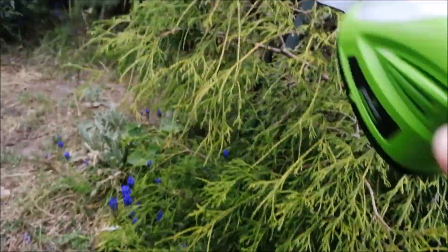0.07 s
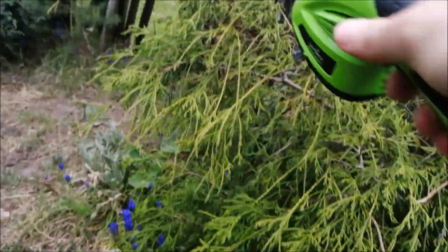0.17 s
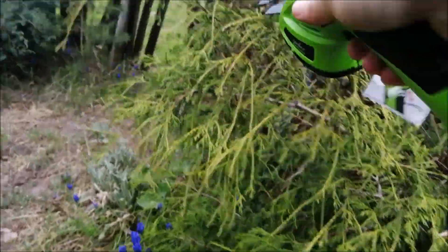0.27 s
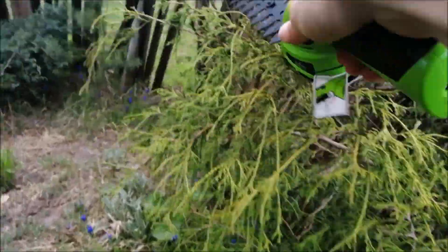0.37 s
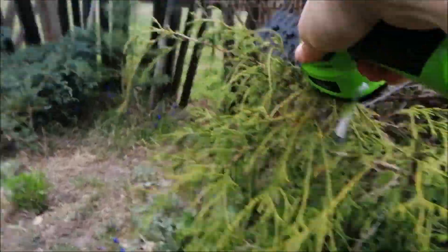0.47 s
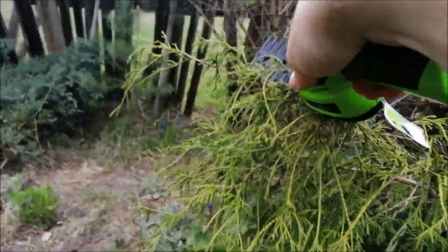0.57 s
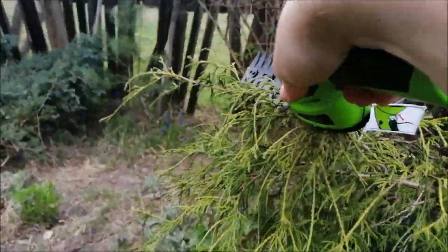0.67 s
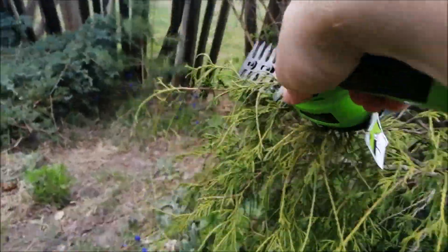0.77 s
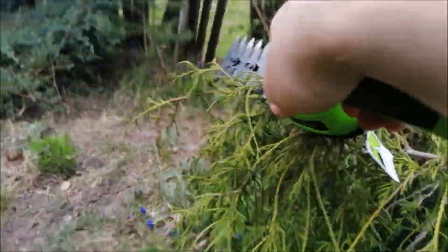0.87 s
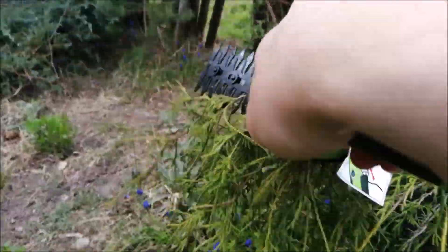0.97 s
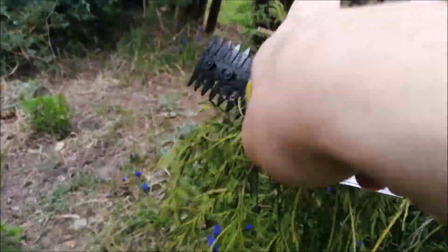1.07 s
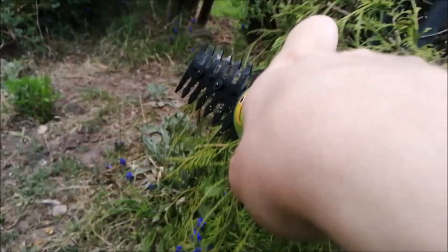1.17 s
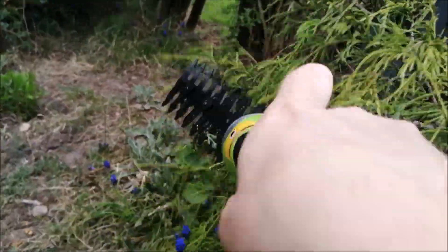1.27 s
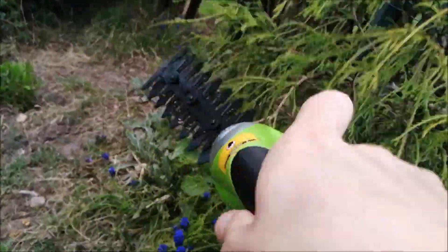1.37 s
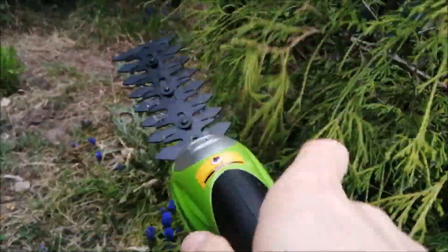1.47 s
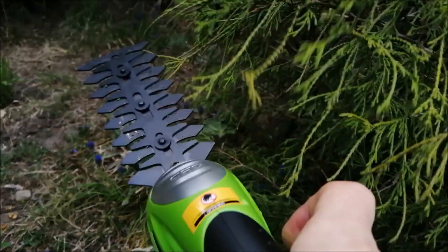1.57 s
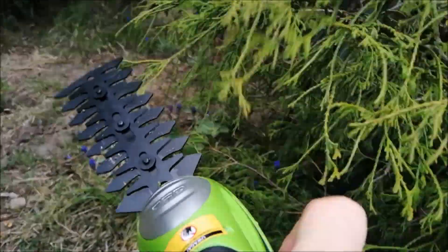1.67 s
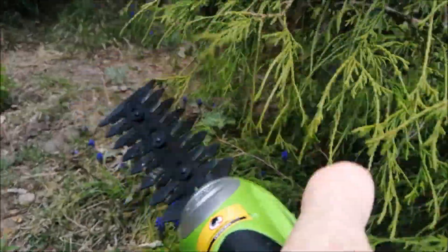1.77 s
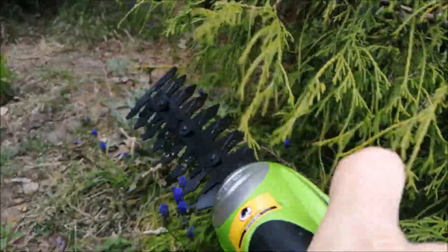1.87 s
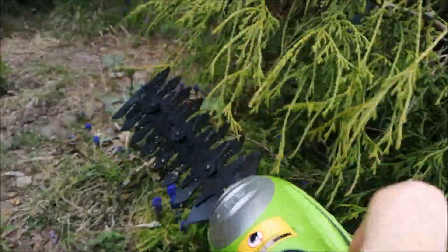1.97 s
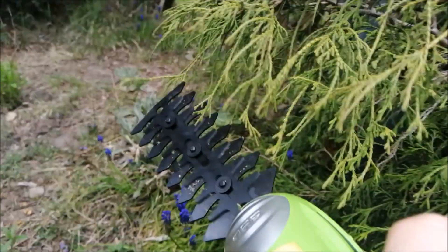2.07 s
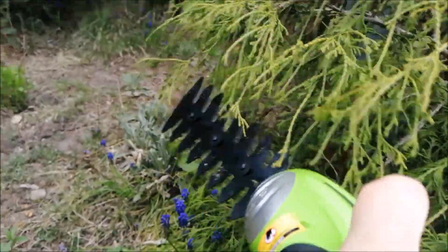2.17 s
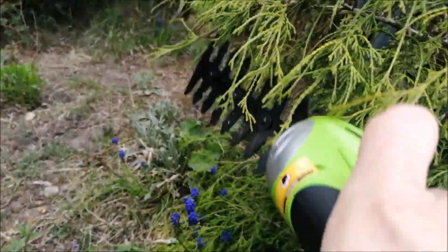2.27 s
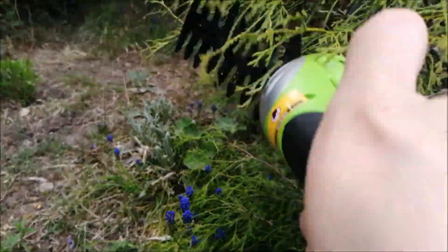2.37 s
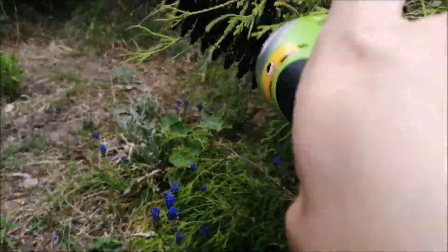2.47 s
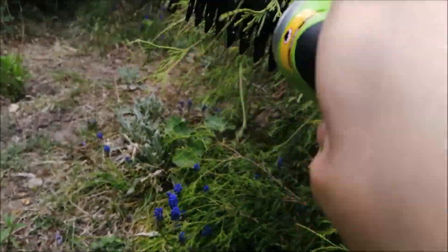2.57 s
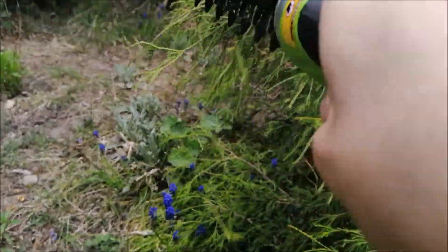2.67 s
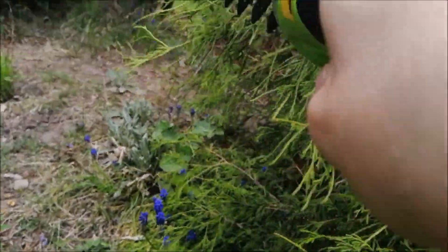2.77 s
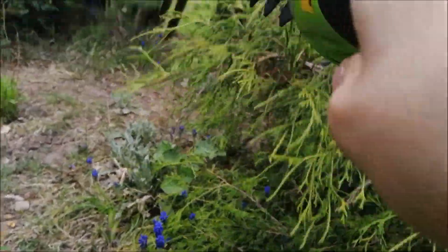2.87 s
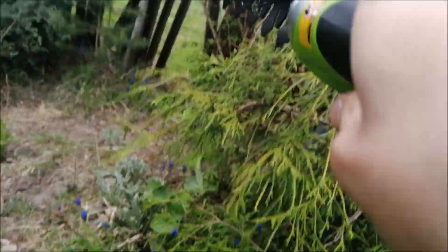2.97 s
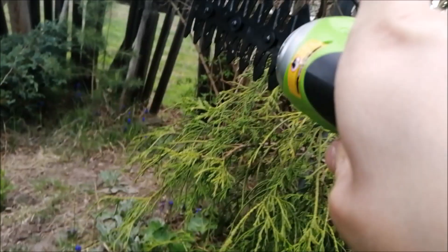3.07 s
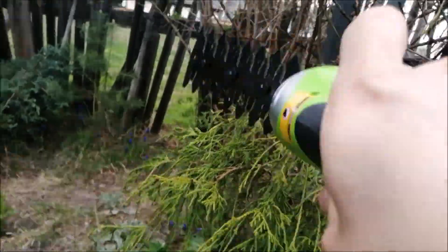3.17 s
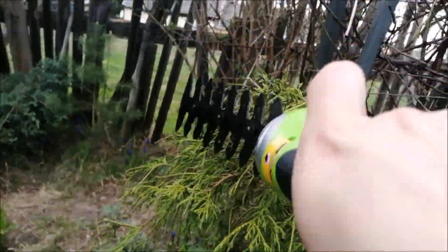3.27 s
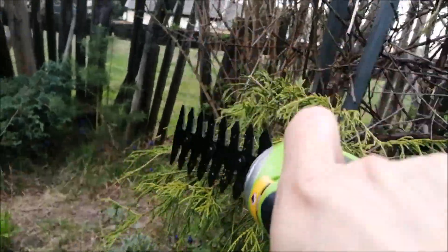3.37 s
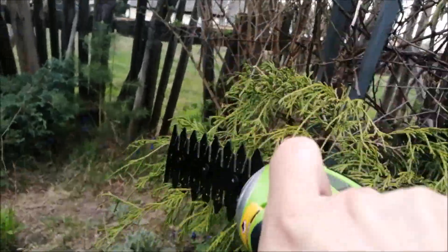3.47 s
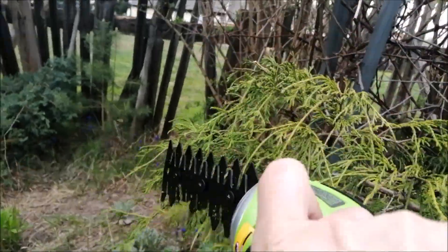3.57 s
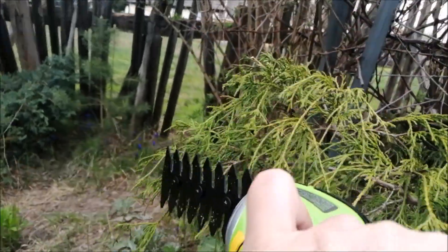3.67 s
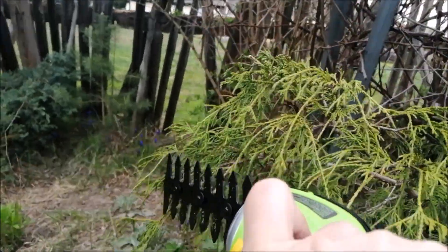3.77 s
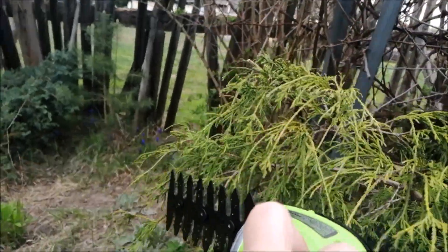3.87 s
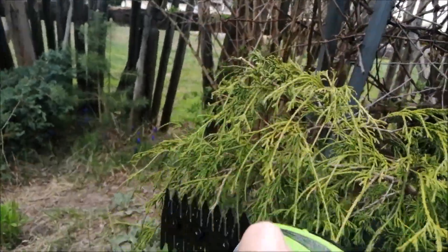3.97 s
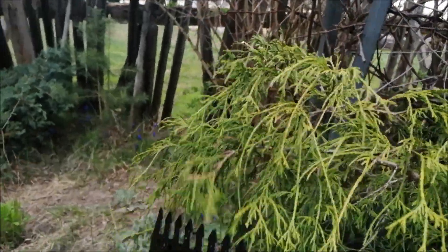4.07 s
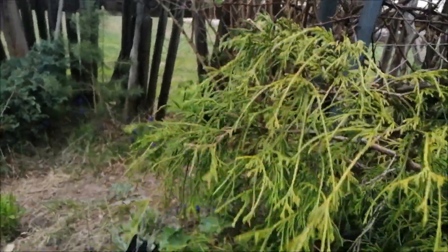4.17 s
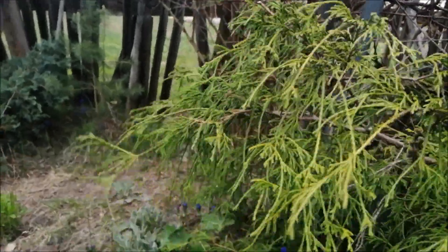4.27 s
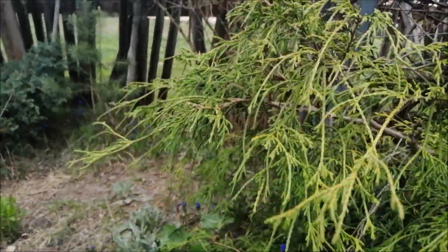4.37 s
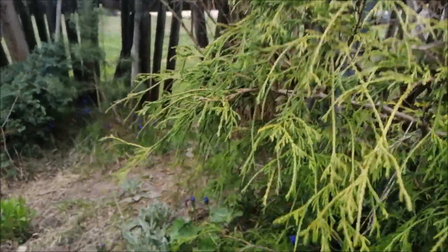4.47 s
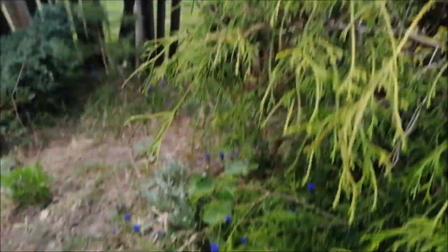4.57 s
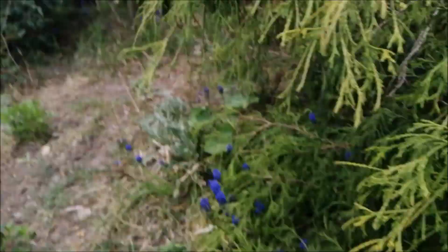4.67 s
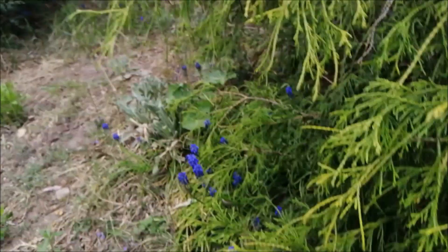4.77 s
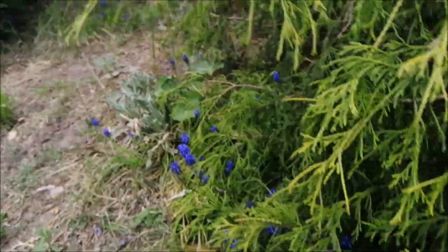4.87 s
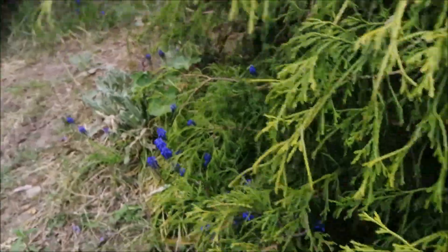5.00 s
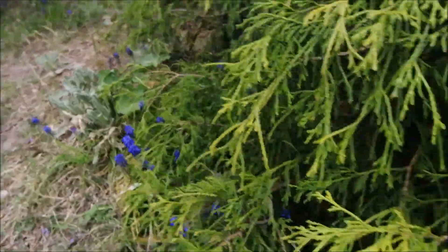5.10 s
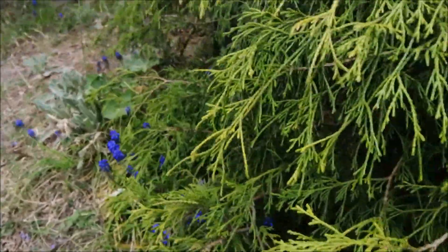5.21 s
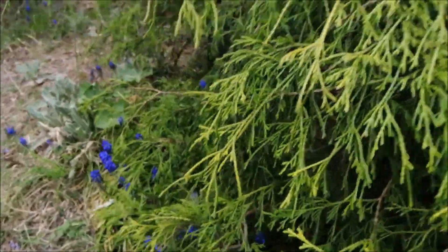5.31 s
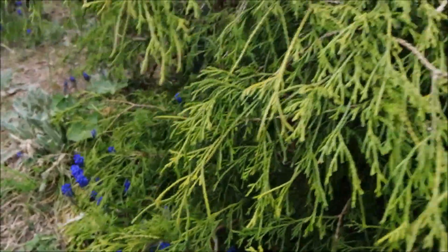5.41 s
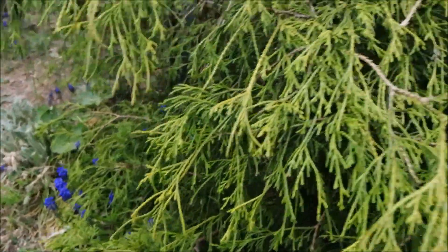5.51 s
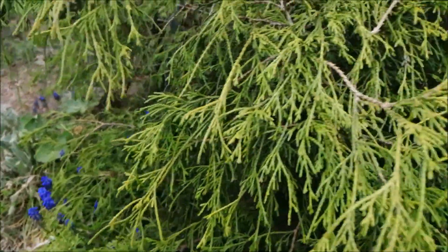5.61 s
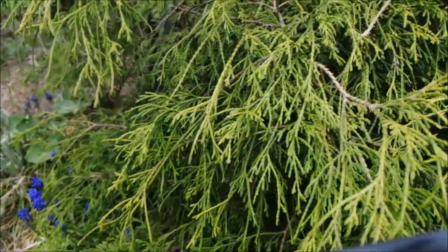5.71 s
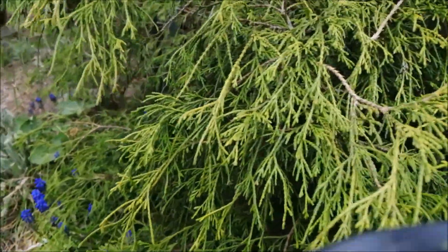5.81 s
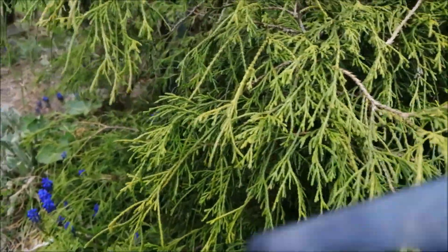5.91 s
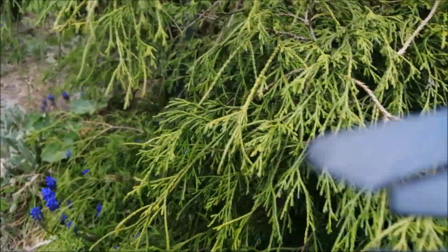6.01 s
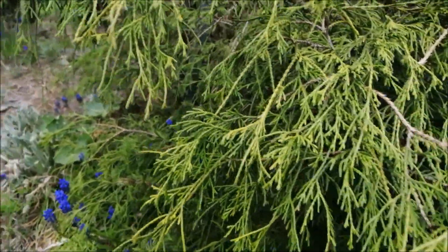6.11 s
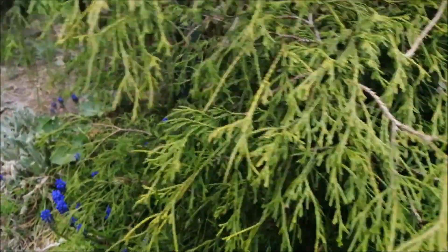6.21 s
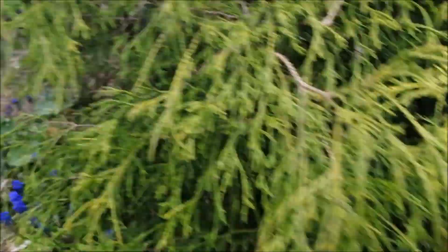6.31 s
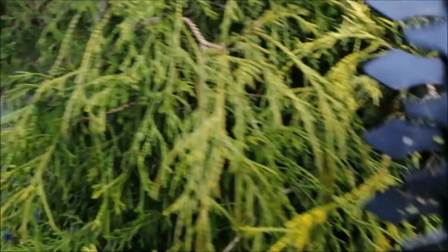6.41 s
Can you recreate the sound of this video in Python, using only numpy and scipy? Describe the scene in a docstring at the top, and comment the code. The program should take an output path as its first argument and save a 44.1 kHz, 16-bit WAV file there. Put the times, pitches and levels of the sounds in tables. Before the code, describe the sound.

Close to the microphone in a quiet garden, small battery shears start at once with a hard, rattling buzz, chop a couple of twigs and wind down quickly. Trigger clicks lead into a longer second run. After it stops, light wind, a soft far dove, tiny chirps and small handling ticks are heard, then sharp clicks and a third burst that is still running at the end.

```python
"""A garden: small battery hedge shears run in three bursts close to a two-port microphone.
A motor drives a two-stage gear train and a crank: shaped noise rattles, rubs and clacks at each
stroke end, steel modes ring and sines locked to the shaft whine. Twigs part in decaying bursts.
Between bursts: clicks of noise and decaying sines, a noise-brushed twig, a far dove and small birds
as sines. Light wind, far rumble and a garden hush of shaped noise lie underneath."""
import sys
import numpy as np
from scipy import signal
from scipy.fft import rfft, irfft, next_fast_len
from scipy.io import wavfile
from scipy.ndimage import uniform_filter1d, map_coordinates

SR = 44100
rng = np.random.default_rng(int(sys.argv[2]) if len(sys.argv) > 2 else 0)


def log_audio(samples):
    """Write samples as a 16-bit WAV file to the path given in sys.argv[1]."""
    # one column per channel
    frames = np.atleast_2d(samples).T
    # limit to full scale, then quantise
    limited = np.clip(frames, -1, 1)
    pcm = np.round(limited * 32767).astype(np.int16)
    wavfile.write(sys.argv[1], SR, pcm)


N = 284445


def amp(db):
    """Gain of a level in dB."""
    return 10 ** (np.asarray(db) / 20)


def unit(x):
    """Scaled so that the mean of the channels has rms 1."""
    mono = np.atleast_2d(x).mean(axis=0)
    return x / np.sqrt(np.mean(mono ** 2) + 1e-20)


def along(points, hz):
    """(Hz, value) points interpolated on a log axis."""
    f, v = np.transpose(points)
    return np.interp(np.log(hz + 1), np.log(f + 1), v)


def curves(rows):
    """One value per sample for each column after the time."""
    s, *cols = np.transpose(rows)
    return [np.interp(np.arange(N) / SR, s, c) for c in cols]


def wobble(knots_per_s):
    """A smooth random curve through normal random knots."""
    at = np.arange(0, N + 16, 16)
    knots = rng.standard_normal(int(N * knots_per_s / SR) + 4)
    return np.interp(np.arange(N), at, map_coordinates(knots, [at * knots_per_s / SR]))


def swell(start_s, length_s, peak_at):
    """A smooth rise and fall of height 1; peak_at is the share of the length spent rising."""
    u = np.clip((np.arange(N) / SR - start_s) / length_s, 0, 1)
    return np.sin(np.pi / 2 * np.minimum(u / peak_at, (1 - u) / (1 - peak_at)))


def sides(db):
    """Left and right gains for a left-right difference."""
    return amp(np.array([db / 2, -db / 2]))


def filtered(x, response):
    """x times a complex response of frequency."""
    m = next_fast_len(N + SR)
    return irfft(rfft(x, m) * response(np.fft.rfftfreq(m, 1 / SR)), m)[..., :N]


def above(hz, edge_hz):
    """Share of power that lies on the upper side of a soft band edge."""
    return 1 / (1 + (edge_hz / (hz + 1)) ** 24)


def patchy(x, depth_db):
    """Slow random patches of gain in time and frequency."""
    z = signal.stft(x, nperseg=512)[2]
    field = uniform_filter1d(rng.standard_normal(z.shape), size=5, axis=1)
    field = uniform_filter1d(field, size=24, axis=2)
    return signal.istft(z * amp(depth_db * field / field.std()), nperseg=512)[1][:, :N]


def rush(spectrum, shared=.1):
    """Stereo noise of one colour; a share of it is common to both ports."""
    noise = rng.standard_normal((2, N)) + shared * rng.standard_normal(N)
    return unit(filtered(noise, lambda hz: amp(along(spectrum, hz))))


# Likeness of the ports. Each row: frequency in Hz, left-right correlation.
PORT_LIKENESS = [(300, 0.31), (800, 0.89), (1800, 0.31), (2500, 0.26), (3200, 0.42), (3900, 0.53),
                 (5000, 0.067), (6000, 0.31), (16000, 0.047)]
# Port balance. Each row: frequency in Hz, left-right difference in dB.
PORT_LEAN = [(60, -8), (110, 6), (200, -2), (380, -3.5), (700, -10.5), (1290, -1.5), (2380, 0.5),
             (4400, 10.5), (8120, -7.5), (15000, 2.5)]


def ports(pair, lag_s=.00016):
    """Two unrelated signals blended as the ports hear a near source; the left port is farther."""
    def blend(hz):
        turn = np.arccos(np.clip(along(PORT_LIKENESS, hz), -1, 1)) / 2
        return np.array([np.cos(turn), np.sin(turn)])

    def lag_and_lean(hz):
        ramp = np.exp(1j * np.pi * hz * lag_s * np.array([[-1], [1]]))
        return ramp * sides(along(PORT_LEAN, hz))

    mid, side = filtered(pair, blend)
    return filtered(np.array([mid + side, mid - side]), lag_and_lean)


# Each row: time in s, buffet in dB, buffet left-right in dB, far rumble in dB.
WIND = [(0.0, -69, 1, -73), (0.36, -72, 26.5, -77.5), (0.43, -90, -9, -85), (0.55, -76, 16, -78.5),
        (0.7, -72.5, -10, -76), (1.0, -73.5, -15.5, -76.5), (1.04, -73, -12, -79), (1.38, -81, -4, -88),
        (1.65, -85.5, -15, -85), (1.9, -55.5, -17.5, -80), (2.01, -88, 2.5, -78), (2.23, -69, -11, -76),
        (2.39, -80, -3, -82), (4.04, -84, 2, -81.5), (4.42, -72, -4, -84.5), (4.62, -67.5, 4.5, -75.5),
        (5.37, -66, -1.5, -84), (6.14, -74.5, -5, -77.5), (6.25, -82, -18.0, -85), (6.45, -82.5, -3, -89)]
# Hush level. Each row: time in s, level in dB.
HUSH_LEVEL = [(1.75, -74.5), (4.4, -80), (4.95, -78), (6.1, -75.5)]
# Colours of buffet, far rumble and hush. Each row: frequency in Hz, density in dB per Hz.
BUFFET_COLOUR = [(12, -29.5), (20, 1), (38, -3.5), (68, -1), (99, -4.5), (160, -24), (210, -48),
                 (350, -120)]
RUMBLE_COLOUR = [(76, -36.5), (130, 5), (329, 1), (420, -2), (550, -39.5), (920, -120)]
HUSH_COLOUR = [(240, -45.5), (400, -12), (521, -10.5), (688, -14), (842, -7), (1340, -16), (1430, -16),
               (2010, -18.5), (3050, -18), (3730, -25), (5330, -20.5), (6530, -24), (16300, -32.5)]


def garden():
    """Wind on the ports, far rumble and the rustling hush: three noises with wavering gain."""
    buffet_db, pan_db, rumble_db = curves(WIND)
    hush_db, = curves(HUSH_LEVEL)
    lumps = amp(2.8 * np.array([wobble(7.7), wobble(7)]) + 2.4 * wobble(14))
    buffet = amp(buffet_db) * sides(pan_db) * unit(lumps * rush(BUFFET_COLOUR, shared=.98))
    rumble = amp(rumble_db + 1.5 * wobble(8)) * rush(RUMBLE_COLOUR, shared=.72)
    flutter = amp(1.1 * wobble(8.3) + .94 * wobble(66))
    hush = flutter * patchy(rush(HUSH_COLOUR, shared=.25), depth_db=3.8)
    return buffet + rumble + amp(hush_db) * hush


# Motor runs. Each row: on in s, off in s, one outward stroke end in s, full-speed crank turns per s.
BURSTS = [(0.006, 1.46, 0.8381, 18.135), (1.905, 4.135, 3.0512, 18.175), (6.135, 7.0, 6.2701, 18.0)]
SPIN_UP_S, COAST_S = .02, .25
ATTACK_S, KICK_S = .0075, .038  # the rattle sets in; the jolt of the start dies away


def motor():
    """Crank angle in turns, onset, share of speed left while coasting, and the jolt of each start."""
    t = np.arange(N) / SR
    angle, onset, coast, jolt = np.zeros((4, N))
    for on_s, off_s, end_s, turns_per_s in BURSTS:
        here, since_s = t >= on_s, np.maximum(t - on_s, 0)
        left = np.clip(1 - (t - off_s) / COAST_S, 0, 1)
        turns = np.cumsum(turns_per_s * (1 - np.exp(-since_s / SPIN_UP_S)) * left) / SR
        angle[here] = (turns - turns[round(end_s * SR)])[here]
        onset[here] = ((1 - np.exp(-since_s / ATTACK_S)) ** 2 * (left > 0))[here]
        coast[here] = left[here]
        jolt[here] = np.exp(-since_s / KICK_S)[here]
    return angle, onset, coast, jolt


def strokes(angle, over_db):
    """Power of the clack at each stroke end over the hiss, strong outward and weak on the return."""
    ends = np.flatnonzero(np.diff(np.floor(2 * angle)) == 1)
    back = np.round(2 * angle[ends]) % 2
    scatter_db = (1.1 + 2.1 * back) * rng.standard_normal(len(ends))
    hits = np.zeros(N)
    hits[ends] = amp(2 * (over_db[ends] - 12 * back + scatter_db))  # doubled dB: power
    u = np.arange(SR // 25) / SR
    shape = (1 - np.exp(-u / .001)) ** 2 * (np.exp(-u / .0021) + .11 * np.exp(-u / .009))
    return np.abs(signal.fftconvolve(hits, shape)[:N])


# The tool moves about the microphone, one list a burst; levels precede each layer's offset.
# Each row: time in s, housing in dB, gears in dB, blade rub in dB, blade hiss in dB,
# clack over the hiss in dB, body left-right in dB, blade left-right in dB.
TOOL = [
    [(0.08, -50, -39.5, -34.5, -46, 3.5, -6, 3.5), (0.114, -50, -38, -34.5, -43, 4, -2, -1),
     (0.482, -52.5, -50, -40.5, -54.5, 3, 8.5, 15), (0.664, -47, -44, -35, -46.5, 3, -3.5, 5.5),
     (0.752, -49, -45, -37, -51, 2.5, -0.5, 10.5), (0.87, -47.5, -43.5, -34.5, -45, 4, -6.5, 1.5),
     (1.014, -45, -42.5, -33.5, -43.5, 0.5, -6.5, 4), (1.078, -47, -45.5, -38, -49, 5.5, -2, 10.0),
     (1.46, -49.5, -43.5, -37.5, -47.5, -2, 0, 6.5)],
    [(1.98, -46, -41, -37, -48.5, 3, -2.0, 1), (2.11, -48.5, -43.5, -35, -46.5, 3.5, -2.0, 4.5),
     (2.24, -47.5, -41, -33.5, -45.5, 4.5, 1, 9.5), (2.73, -45.5, -41.5, -34.5, -46.5, -1.5, 1.5, 9.5),
     (2.94, -46.5, -40.5, -35, -47.5, 2.5, 4.5, 8.5), (3.3, -49, -45, -37, -47.5, 0, 4, 9),
     (3.76, -49, -44, -38.5, -50, 2.5, 3.5, 13), (4.13, -49.5, -42.5, -36.5, -49, 4, 0.5, 10),
     (4.14, -48.5, -45.5, -40, -49.5, 0, 3.5, 12)],
    [(6.2, -52.5, -45.5, -39, -44.5, 3.5, 3.5, 3), (6.402, -60.5, -49.5, -43.5, -45, 10, 4.5, 7),
     (6.44, -53.5, -44, -40, -42.5, 2.5, 5, 10.5)],
]
# Tone of the last gear mesh, one list a burst. Each row: time in s, relative level in dB.
MESH = [
    [(0.05, -69.5), (0.108, -74.5), (0.178, -77), (0.202, -61), (0.63, -49), (1.008, -46.5), (1.058, -60),
     (1.46, -64)],
    [(1.95, -54), (2.26, -51), (2.5, -60.5), (2.9, -48), (2.93, -66), (2.99, -53), (3.3, -67), (3.65, -55),
     (4.11, -51.5), (4.14, -53)],
    [(6.18, -67), (6.206, -74), (6.44, -70)],
]
# Tones locked to the middle shaft. Each row: shaft order, dB relative to housing (gears above order 20).
SHAFT_TONES = [(8.7, -36.5), (10.5, -2), (12, -9.5), (15, -16), (16, -11), (17, -11), (25.9, 3.5),
               (29, -0.5), (31, -9.5)]
# Colours of housing and steel. Each row: frequency in Hz, density in dB per Hz.
BODY_COLOUR = [(210, -46), (350, -27), (377, -30.5), (1020, 1), (1120, -5), (1310, -1.5), (1430, -4.5),
               (1650, 0.5), (1940, -8), (2290, -3), (2570, 3.5), (2770, 2.5), (3410, 4.5), (3790, -0.5),
               (4300, 7), (5590, -33.5), (9460, -120)]
STEEL_COLOUR = [(2180, -44), (3700, -32), (4430, -5.5), (4760, 4.5), (5000, 3), (7260, -6.5), (8340, -15),
                (10600, -17), (11400, -16), (12400, -12), (14700, -5), (15600, -33)]
# Blade modes. Each row: frequency in Hz, width in Hz, relative level in dB.
BLADE_MODES = [(7535, 20, -3), (7748, 14, -4), (8705, 80, -4), (9044, 30, -3), (11442, 70, 0),
               (13545, 100, -4), (14718, 150, -4)]
# Low push of the stroke ends: level in dB, one a burst; in the last the blade is closest.
THUMP_DB = [-89.5, -91, -83.5]
PINION_TEETH, WHEEL_TEETH = 13, 72  # on the middle shaft, on the crank
FADE_CURVE = 5.4  # the rattle holds while the motor slows, then drops away
HISS_HZ, HISS_FADE_CURVE = 7900, 2.83  # layers from here up fade first


def shears():
    """Rattle of gear teeth and rubbing blades, sounding through housing and steel."""
    angle, onset, coast, jolt = motor()
    housing_db, gears_db, rub_db, hiss_db, over_db, body_pan_db, blade_pan_db = curves(np.vstack(TOOL))
    mesh_db, = curves(np.vstack(MESH))
    shaft = 2 * np.pi * angle * WHEEL_TEETH / PINION_TEETH + .06 * wobble(14)
    clack = strokes(angle, over_db)
    two_turns = round(2 * SR / BURSTS[0][-1])
    mean_clack = uniform_filter1d(clack, size=two_turns)
    white = patchy(ports(rng.standard_normal((2, N))), depth_db=2.04)

    # uneven teeth: the rattle throbs once a turn of the middle shaft and of the motor
    throb_db = .73 * np.cos(shaft) + .3 * np.cos(2.7 * shaft)
    rattle = amp(1.0 * wobble(900) + throb_db + .5 * wobble(40))
    load = np.cos(2 * np.pi * (angle + .15))  # the blades press hardest near the outward end
    passing = np.cos(2 * np.pi * (4 * angle + .021))  # blade teeth cross four times a turn

    # Each row: colour, from Hz, to Hz, clack share, load in dB, level in dB, left-right in dB,
    # loss at standstill in dB, start jolt in dB.
    layers = [
        (BODY_COLOUR, 1, 470, 6, .8, housing_db + over_db - 33, body_pan_db - .3, 30, 6),
        (BODY_COLOUR, 470, 2000, 1.5, .8, housing_db, body_pan_db + 1.5, 36, 6),
        (BODY_COLOUR, 2000, 4000, .8, .8, gears_db - .3, body_pan_db - 2.5, 45, 6),
        (STEEL_COLOUR, 4000, 5500, 3, 1.8, rub_db - 7.5, blade_pan_db - 6, 45, 5),
        (STEEL_COLOUR, 5500, 8000, 6, 1.8, rub_db - 4.5, blade_pan_db - .5, 60, 5),
        (STEEL_COLOUR, 8000, 11000, 18, .4, hiss_db - 2.5, -3, 75, 6),
        (STEEL_COLOUR, 11000, SR, 60, .3, hiss_db - 6.5, -3.2, 80, 6)]
    out = 0
    for colour, lo_hz, hi_hz, blow, press_db, level_db, pan_db, loss_db, jolt_db in layers:
        def band_response(hz):
            share = np.abs(above(hz, lo_hz) - above(hz, hi_hz))
            return amp(along(colour, hz)) * np.sqrt(share)

        drive = white * rattle * amp(press_db * load + .78 * passing) * np.sqrt(1 + blow * clack)
        drive = drive / np.sqrt(1 + blow * mean_clack)  # level counts rub and clack together
        curve = HISS_FADE_CURVE if lo_hz >= HISS_HZ else FADE_CURVE
        gain = onset * amp(level_db + jolt_db * jolt - loss_db * (1 - coast) ** curve)
        out = out + gain * unit(filtered(drive, band_response)) * sides(pan_db + np.zeros(N))
        push = gain * drive

    def blade_response(f):
        return sum(amp(db) * 1j * f * np.sqrt(width_hz) / (hz * hz - f * f + 1j * f * width_hz)
                   for hz, width_hz, db in BLADE_MODES)

    # rub and clacks of the top layer ring the steel
    out = out + amp(-57.0) * unit(filtered(push, blade_response))

    burst = np.searchsorted([on_s for on_s, *_ in BURSTS[1:]], np.arange(N) / SR)
    thump = unit(filtered(clack, lambda hz: above(hz, 91) ** .14 * (1 - above(hz, 420)) ** .102))
    out = out + onset * coast ** 2 * amp(np.take(THUMP_DB, burst)) * thump

    port_phase = np.array([[0], [1.2]])  # radians
    tones = np.sin(PINION_TEETH * shaft + port_phase) * amp(mesh_db + 2.0)
    for order, db in SHAFT_TONES:
        part_db = gears_db if order > 20 else housing_db
        tone = np.sin(order * shaft + port_phase + 1.7 * wobble(15))
        tones = tones + tone * amp(db - 12.5 + part_db + 3.2 * wobble(15))
    return out + (1 - jolt) * onset * coast ** 3.2 * tones * sides(body_pan_db - 1.0)


# Twigs sheared through. Each row: start in s, relative level in dB, relative low push in dB.
CUTS = [(1.0567, -22.5, -28), (1.114, -24.5, -26.5), (2.638, -24.5, -45), (3.71, -31.5, -46)]


def cuts():
    """A woody chop as a thick twig parts: a snap, a knock in the housing and a short low push."""
    out, t = np.zeros(N + SR), np.arange(SR // 20) / SR
    soft = 1 - np.exp(-t / .00317)
    for start_s, db, push_db in CUTS:
        knock = amp(-60 * t / .021) * np.sin(2 * np.pi * 880 * t)
        knock = knock + .42 * amp(-60 * t / .019) * np.sin(2 * np.pi * 620 * t)
        noise = uniform_filter1d(rng.standard_normal(len(t) + 1), size=4)
        snap = 1.3 * amp(-60 * t / .027) * np.diff(noise)
        push = amp(push_db + 11.0 - 60 * t / .028) * np.sin(2 * np.pi * 330 * t)
        out[round(start_s * SR):][:len(t)] += amp(db + .5) * soft * (knock + push + snap)
    return out[:N]


# A thin high ring lingers as the motor stops. Each row: start in s, relative level in dB, t60 in s.
BLADE_RINGS = [(1.63, -57.5, 1.2), (4.32, -71, 2.5)]
RING_HZ, RING_LASTS_S = 7754, .36


def ring():
    """One thin high steel mode that wavers irregularly while it fades."""
    t = np.arange(N) / SR
    fade = sum(swell(start_s, RING_LASTS_S, peak_at=.077) ** .29 * amp(db - 60 * np.abs(t - start_s) / t60_s)
               for start_s, db, t60_s in BLADE_RINGS)
    waver = amp(2.5 * wobble(60)) * np.abs(np.cos(.9 * wobble(15)))
    return fade * waver * np.sin(2 * np.pi * RING_HZ * t + .4 * wobble(80))


# Trigger and grip. Each row: start in s, level in dB, then relative to it low knock in dB and ring in dB,
# left-right in dB.
CLICKS = [(1.6831, -37.5, -20, -26, 0), (1.7829, -21.5, -20.5, -25.5, 8), (1.8499, -47.5, -30, -18, -6.5),
          (1.9081, -21.5, -28, -27, -10), (4.558, -70, 5, -26, -5), (4.799, -61.5, -21, -22, -4),
          (4.837, -56.5, -7, -24, 0.5), (5.033, -44, -25, -24, 4), (5.0404, -52, -6, -18, -7.5),
          (5.0786, -50.5, -2, -28, -5.5), (5.0904, -53, -7, -18, -6), (5.127, -55, -12, -15, 2.5),
          (5.1865, -33, -15, -27.5, 6), (5.223, -65, -0.5, -22, -0.5), (5.7908, -54, -1.5, -30, -5),
          (5.8207, -55, -5, -18, -6), (5.8804, -47, -31, -16, -3), (5.905, -46, -25, -31, 2),
          (5.927, -66.5, 3.5, -26, -6), (6.0475, -58.5, -7, -17, -10), (6.107, -22, -14.5, -31, 2.5),
          (6.1387, -27, -11, -27, -4.5)]
# Shell modes. Each row: frequency in Hz, relative level in dB, t60 in s.
SHELL_MODES = [(1093, -7.5, 0.17), (3310, -5.5, 0.12), (3600, -12.5, 0.22), (4140, -20, 0.16),
               (4610, -17.5, 0.27), (5190, -15.5, 0.25)]
# Crack colour. Each row: frequency in Hz, density in dB per Hz.
CRACK_COLOUR = [(820, -39), (1400, -7), (1650, -6), (2210, 2.5), (5060, 0), (10600, -15.5), (14700, -25),
                (16000, -12)]


def clicks():
    """Each click is a short crack, a knock in the hollow grip and a faint rough ring of the shell."""
    crack, shell = np.zeros((2, N + SR)), np.zeros((2, N + SR))
    t = np.arange(SR // 3) / SR
    soft = (1 - np.exp(-t / .00052)) ** 2
    for start_s, db, knock_db, ring_db, pan_db in CLICKS:
        first = round(start_s * SR)
        at = slice(first, first + len(t))
        gain = amp(db) * sides(pan_db)[:, None] * soft
        crack[:, at] += gain * amp(-60 * t / .019) * rng.standard_normal((2, len(t)))
        rough = uniform_filter1d(rng.standard_normal((len(SHELL_MODES), len(t))), size=300, axis=1)
        shell_ring = sum(amp(ring_db + mode_db - 60 * t / t60_s) * r / r.std() * np.sin(2 * np.pi * hz * t)
                         for (hz, mode_db, t60_s), r in zip(SHELL_MODES, rough))
        knock = amp(knock_db + 2.5 - 60 * t / .032) * np.sin(2 * np.pi * 1000 * t)
        shell[:, at] += gain * (shell_ring + knock)
    return filtered(ports(crack[:, :N]), lambda hz: amp(along(CRACK_COLOUR, hz))) + shell[:, :N]


# Faint far chirps. Each row: start in s, start in Hz, end in Hz, length in s, peak in dB.
CHIRPS = [(4.453, 4520, 5120, .03, -89), (4.606, 4700, 5130, .03, -77), (5.406, 5070, 6200, .03, -83.5),
          (5.55, 3980, 6000, 0.023, -89), (5.688, 3200, 3260, 0.047, -93.5)]


def birds():
    """Short rising whistles: gliding sines under a half-sine swell."""
    out = np.zeros(N)
    for start_s, from_hz, to_hz, length_s, db in CHIRPS:
        u = np.linspace(0, 1, round(length_s * SR))
        phase = 2 * np.pi * np.cumsum(from_hz + (to_hz - from_hz) * u) / SR
        out[round(start_s * SR):][:len(u)] += amp(db) * np.sin(np.pi * u) * np.sin(phase)
    return out


# Coos. Each row: start in s, length in s, frequency in Hz, relative level in dB.
COOS = [(4.46, 0.34, 523, -81.5), (5.09, 0.13, 520, -85), (5.602, 0.17, 520, -77.5),
        (5.907, 0.21, 512, -82.5)]


def dove():
    """Soft, breathy far coos, sines that swell toward their end."""
    t = np.arange(N) / SR
    breath = amp(3.1 * wobble(70))
    waver = .66 * wobble(45)  # radians
    coos = sum(amp(db + 7) * swell(start_s, length_s, peak_at=.7) ** .51 * np.sin(2 * np.pi * hz * t + waver)
               for start_s, length_s, hz, db in COOS)
    return breath * coos


# Brush strokes. Each row: start in s, length in s, peak level in dB.
BRUSHES = [(4.678, .24, -77), (5.826, .085, -52.5), (5.89, 0.036, -60.5)]
# Twig colour. Each row: frequency in Hz, density in dB per Hz.
TWIG_COLOUR = [(880, -62.5), (1500, -27.5), (2410, -11), (2610, -2.5), (2910, -16.5), (5170, -2),
               (7030, -4.5), (16000, -25.5)]


def brush():
    """Needles drag along the blade: rough noise in narrow swells."""
    drag = sum(amp(db) * swell(start_s, length_s, peak_at=.5) ** 5 for start_s, length_s, db in BRUSHES)
    return drag * unit(amp(3.5 * wobble(750)) * rush(TWIG_COLOUR))


def scene():
    """Everything as it reaches the two ports."""
    return garden() + shears() + cuts() + ring() + clicks() + birds() + dove() + brush()


TOP_HZ = 16300


def record(dry):
    """Nothing is kept above the band limit."""
    return filtered(dry, lambda hz: hz < TOP_HZ)


dry = scene()
out = record(dry)
log_audio(out)
```